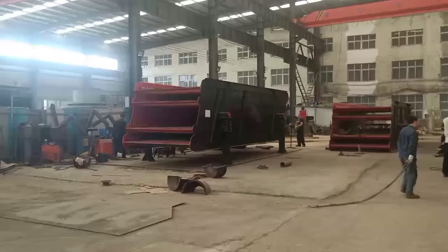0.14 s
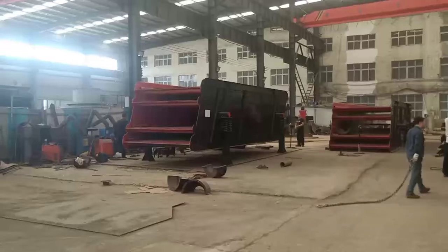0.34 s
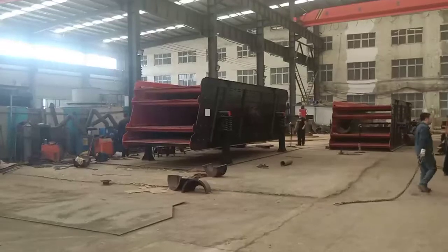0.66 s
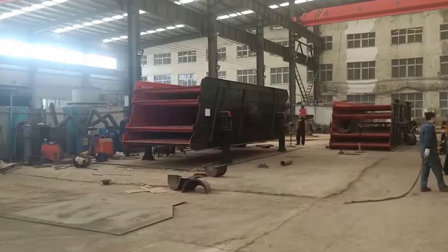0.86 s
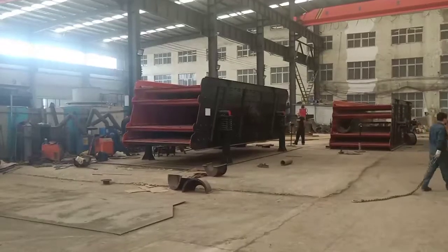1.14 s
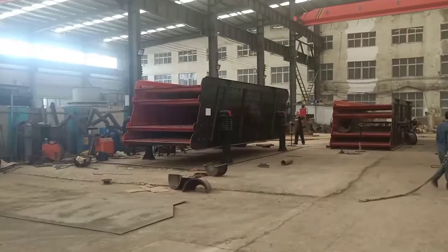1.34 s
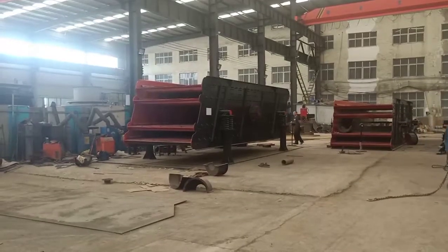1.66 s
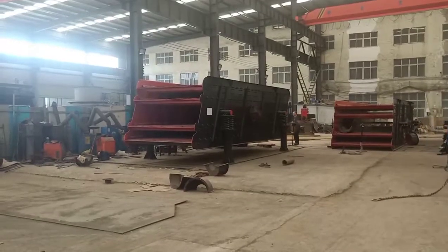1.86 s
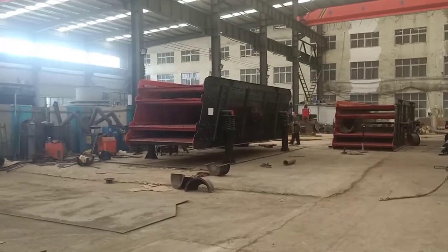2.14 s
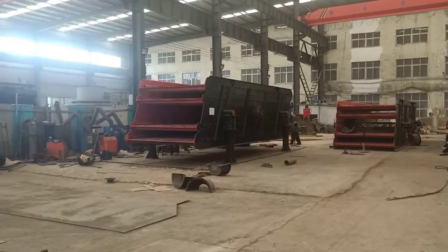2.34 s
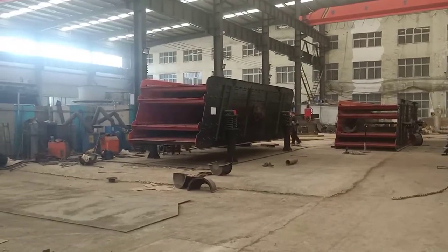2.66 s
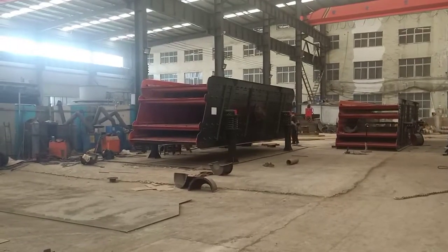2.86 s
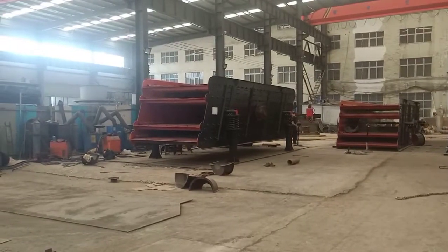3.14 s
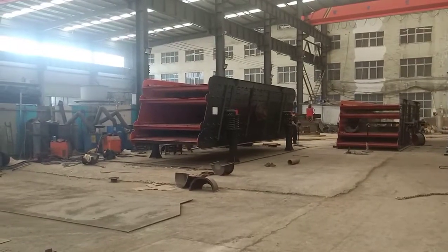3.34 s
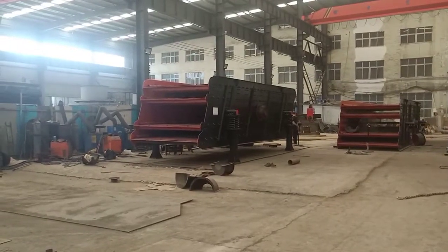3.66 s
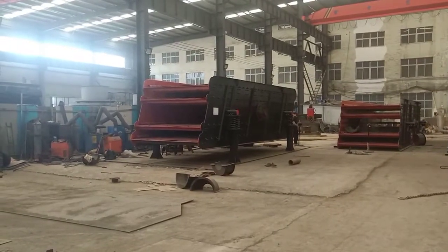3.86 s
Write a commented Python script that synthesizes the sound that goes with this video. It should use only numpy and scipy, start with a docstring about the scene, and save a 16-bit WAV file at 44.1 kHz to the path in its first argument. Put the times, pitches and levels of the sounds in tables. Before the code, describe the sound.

A large vibrating screen machine runs, its steel decks clattering in surges over a thumping drone.

```python
"""A large vibrating screen runs empty in an open workshop hall, heard from some ten metres.
Its loose steel decks clatter and ring in surges, the wire mesh sizzles on top, and heavy parts
rattle lower on the frame, with one harder knock. Underneath, each turn of the eccentric shaft
thumps the box and drives a drone, over a 100 Hz hum, motor tones and a bed of rumble.
The sound fades in at the start."""
import sys
import numpy as np
from scipy import signal
from scipy.fft import rfft, irfft
from scipy.io import wavfile
from scipy.ndimage import uniform_filter1d

SR = 44100
rng = np.random.default_rng(int(sys.argv[2]) if len(sys.argv) > 2 else 0)


def transcribe(u):
    """Save the signal u as a 16-bit wav file named by the first command-line argument.

    u: samples, shape (n,) or (channels, n), limited to [-1, 1]; the rate is SR.
    q: integer samples, one column per channel.
    """
    v = np.clip(np.atleast_2d(u).T, -1, 1)
    q = np.round(v * 32767).astype(np.int16)
    wavfile.write(sys.argv[1], SR, q)


N = 176400
T = np.arange(N) / SR

SHAFT_HZ, MOTOR_HZ, MOTOR_ORDERS = 16.652, 24.45, [5, 10]
BLOW_SCATTER_DB, BLOW_JITTER_S, BLOW_DETUNE = 1.1, .00015, .032  # spread from turn to turn
RATTLE_JITTER_S, DECK_Q = .002, 220
SURGE_ATTACK_S, SURGE_DECAY_S = 0.054, 0.29
KNOCK_S, KNOCK_HZ, KNOCK_T60_S, KNOCK_DB = 1.566, 540, 0.1, -21
HALL_T60_S, TOP_HZ = 0.9, 11900
RUMBLE_DB, FRAME_DB, MESH_DB, DULL_DB, BRIGHT_DB = -35.5, -1.67, 1, -3.2, -2  # layer trims

# fade-in of the low layers and the resting rattle: t/s, gain/dB
FADE_IN = [(.15, -51), (.165, -17.5), (.21, -9), (.28, -3), (.39, 2), (.45, 4.5)]
# tone colour of the rumble: f/Hz, relative level/dB
RUMBLE_SPECTRUM = [(25, -42), (55, -41), (85, -14), (115, -6), (160, 5.5), (230, 2.5), (330, -2),
                   (430, -4.5), (700, -29.5)]
# 100 Hz hum and steady drone tones: multiple of the shaft rate
TONE_ORDERS = [6, 7, 15, 21, 22, 23, 24, 26, 31, 32, 33, 34, 37, 38, 40, 44]
# their balance: relative level/dB
TONE_DB = [-42, -46.5, -42, -44.5, -44, -51, -45, -49.5, -47.5, -48.5, -49, -45.5, -46.5, -47, -48, -52]
# balance of the motor tones: relative level/dB
MOTOR_TONE_DB = [-48, -49]
# blows on the box in each turn: t/s into the turn, f/Hz, half length/s, relative level/dB
BOX_BLOWS = [(0.0311, 185.4, 0.0034, -30), (0.061, 317, 0.0093, -37.5)]
# level ride of the thumps: t/s, gain/dB
THUMP_RIDE = [(.25, -1), (.48, -0.5), (.9, -1.5), (1.5, -3.5), (2.1, -4), (2.72, -4.5), (2.86, -1),
              (3.25, -2), (3.6, -3), (4, -1.5)]
# level ride of the frame clatter: t/s, gain/dB
FRAME_RIDE = [(0.16, -56), (0.22, -40.5), (0.38, -30), (1.3, -30.5), (1.65, -32.5), (2.3, -28.5),
              (2.55, -32), (2.79, -31), (2.87, -26), (3.73, -28.5), (4.0, -28)]
# tone colour of the frame clatter: f/Hz, relative level/dB
FRAME_SPECTRUM = [(250, -41), (400, -16), (470, -7.5), (540, -2), (640, -0.5), (735, -1), (810, -4),
                  (950, -8), (1200, -14.5), (2000, -49)]
# tone colour of the high sizzle, with an EQ notch near 10 kHz: f/Hz, relative level/dB
SIZZLE_SPECTRUM = [(2000, -40), (3200, -4), (4000, 1.5), (5000, 1), (6500, -0.5), (8000, -2.5),
                   (9200, -2.5), (10200, -26), (11500, -11.5)]
# tone colour of the dull deck clatter: f/Hz, relative level/dB
DULL_SPECTRUM = [(700, -18), (1000, -7.5), (1250, -8), (1450, -2), (1700, -3), (2050, 0), (2300, -4),
                 (2700, -19), (4000, -53)]
# tone colour of the bright deck clatter: f/Hz, relative level/dB
BRIGHT_SPECTRUM = [(1600, -31), (2100, -5), (2400, 0.5), (2570, 2), (2700, -5), (2810, 0.5), (3050, -5.5),
                   (3400, -7.5), (4200, -15), (7000, -55)]
# modes of the lower-pitched deck: f/Hz
LOW_MODE_HZ = [980, 1464, 1502, 1653, 1778, 1846, 1922, 2010, 2287, 2751, 2800, 3130]
# their balance: relative level/dB
LOW_MODE_DB = [-4.5, -3.5, .5, -2, -3, 2, -7, -0.5, -0.5, 0, -2.5, -3.5]
# modes of the higher-pitched deck: f/Hz
HIGH_MODE_HZ = [1416, 1599, 1975, 2014, 2075, 2234, 2420, 2474, 2630, 2765, 2880, 2950, 3004, 3262]
# their balance: relative level/dB
HIGH_MODE_DB = [-4, -4.5, -1.5, -1.5, 0, -5.5, -4, 0.5, -2, -0.5, 2, -3, -2, -6]
# surges of rattle: t/s, hold/s, then relative level/dB for each of
# dull clatter, bright clatter, mesh sizzle, low deck ring, high deck ring
RATTLE_SURGES = [(0.337, 0.063, -30.5, -27.5, -34, -26.5, -34), (0.676, 0.11, -30, -28, -38, -29, -37),
                 (0.97, 0.05, -27, -28.5, -41, -31, -35), (1.228, 0.11, -27.5, -29, -39.5, -30, -33),
                 (1.54, 0.033, -26.5, -30, -34.5, -34, -32), (1.793, 0.08, -28.5, -32, -37.6, -33, -32),
                 (1.94, 0.11, -29.5, -41, -38.5, -48, -39), (2.162, 0.06, -32, -29, -36.5, -38, -36.5),
                 (2.795, 0.068, -31.0, -28.5, -35.7, -40, -31.5),
                 (3.147, 0.12, -28, -26.5, -36, -38, -29.5), (3.464, 0.13, -32.5, -27, -36, -38, -31.5),
                 (3.776, 0.16, -30.5, -28, -37.5, -34, -31)]


def undb(db):
    """Decibels to gain."""
    return 10 ** (np.asarray(db) / 20)


def unit(x):
    """Scale to rms 1."""
    return x / np.sqrt(np.mean(x ** 2))


def ride(points):
    """A fader move through (t/s, gain/dB) points."""
    times, db = np.array(points).T
    return undb(np.interp(T, times, db))


def drift(rate_hz):
    """Slow, smooth random motion; rms 1."""
    span = int(SR / rate_hz)
    steps = np.repeat(rng.standard_normal(N // span + 1), span)
    return unit(uniform_filter1d(uniform_filter1d(steps, span), span)[:N])


def colour(x, points):
    """EQ through (f/Hz, level/dB) points; rms 1."""
    hz, db = np.array(points).T
    bin_hz = np.maximum(np.fft.rfftfreq(N, 1 / SR), 1)
    gain = undb(np.interp(np.log(bin_hz), np.log(hz), db))
    return unit(irfft(rfft(x) * gain, N))


def hall(x, wet_db):
    """Direct sound plus a diffuse tail that wraps round, so the hall is already full of sound."""
    tail = rng.standard_normal(N) * np.exp(-np.log(1000) * T / HALL_T60_S)
    return x + undb(wet_db) * irfft(rfft(x) * rfft(tail / np.linalg.norm(tail)), N)


def rumble():
    """The bed: diffuse low noise of the machine in the hall."""
    return undb(RUMBLE_DB) * colour(rng.standard_normal(N), RUMBLE_SPECTRUM)


def hum(hz, db, waver_db=1.2):
    """One steady tone whose level wavers a little."""
    peak = np.sqrt(2) * undb(db + waver_db * drift(rate_hz=4.08))
    return peak * np.sin(2 * np.pi * (hz * T + rng.random()))


def drone():
    """A 100 Hz hum and steady tones at multiples of the shaft rate; motor tones beat against them."""
    tones = sum(hum(k * SHAFT_HZ, db) for k, db in zip(TONE_ORDERS, TONE_DB))
    motor = sum(hum(k * MOTOR_HZ, db) for k, db in zip(MOTOR_ORDERS, MOTOR_TONE_DB))
    return tones + motor


def turns():
    """The machine's pulse: start times of the shaft's turns."""
    return np.arange(-1, N / SR * SHAFT_HZ) / SHAFT_HZ


def thumps():
    """The box wall flexes in one short swell per turn, and knocks more lightly on the way back."""
    blows, starts = 0, turns()
    for at, hz, half_length, db in BOX_BLOWS:
        late, force, detune = rng.standard_normal((len(starts), 3)).T
        turn = np.clip(np.round((T - at) * SHAFT_HZ).astype(int) + 1, 0, len(starts) - 1)
        from_peak = T - (starts + at + BLOW_JITTER_S * late)[turn]
        pitch = hz * (1 + BLOW_DETUNE * detune[turn])
        swell = np.exp(-.5 * (from_peak / half_length) ** 2)
        flex = swell * np.sin(2 * np.pi * pitch * from_peak)
        blows = blows + undb(db) * unit(flex * undb(BLOW_SCATTER_DB * force[turn]))
    return hall(blows * ride(THUMP_RIDE), wet_db=-21)


def contacts(parts):
    """Loose parts each click once a turn, near their own shaft angle and with uneven force."""
    starts = turns()[:, None]
    angle, side = rng.random(parts), rng.choice([-1, 1], parts)
    late = RATTLE_JITTER_S * rng.standard_normal((len(starts), parts))
    force = side * rng.random(late.shape) ** 2
    times = starts + angle / SHAFT_HZ + late
    inside = (times >= 0) & (times < N / SR)
    return np.bincount((times[inside] * SR).astype(int), force[inside], N)[:N]


def clatter(parts):
    """Three groups of loose parts across the machine, each with its own path through the hall."""
    return sum(hall(contacts(parts), wet_db=3.5) for _ in range(3))


def knock():
    """One heavier part strikes the frame, which rings briefly."""
    age = np.maximum(T - KNOCK_S, 0)
    ring = np.sin(2 * np.pi * KNOCK_HZ * age) * np.exp(-np.log(1000) * age / KNOCK_T60_S)
    return hall(undb(KNOCK_DB) * ring, wet_db=-7)


def frame():
    """Heavy loose parts clatter on the frame and give the rattle its body."""
    return undb(FRAME_DB) * ride(FRAME_RIDE) * colour(clatter(parts=28), FRAME_SPECTRUM)


def surges(column, rest_db):
    """Envelope of a rattle layer: each surge bites, holds, then dies back to the resting rattle."""
    power = (undb(rest_db) * ride(FADE_IN)) ** 2
    for row in RATTLE_SURGES:
        age, hold = T - row[0], row[1]
        rise = np.clip(age / SURGE_ATTACK_S, 0, 1)
        fall = np.exp(-np.maximum(age - SURGE_ATTACK_S - hold, 0) / SURGE_DECAY_S)
        power = power + (undb(row[column]) * rise * fall) ** 2
    return np.sqrt(power)


def mesh():
    """Many wire crossings tick together into a sizzle."""
    sizzle = colour(clatter(parts=70), SIZZLE_SPECTRUM)
    return undb(MESH_DB) * surges(column=4, rest_db=-45) * sizzle


def deck_ring(mode_hz, mode_db):
    """A steel deck's narrow modes, kept ringing by loose parts that strike it."""
    hits = clatter(parts=26)
    modes = [signal.lfilter(*signal.iirpeak(hz, DECK_Q, fs=SR), hits) for hz in mode_hz]
    return unit(sum(undb(db) * unit(mode) for mode, db in zip(modes, mode_db)))


def decks():
    """The decks chatter against their supports, dull and bright, and each rings with its own modes."""
    dull = surges(column=2, rest_db=-33) * colour(clatter(parts=26), DULL_SPECTRUM)
    bright = surges(column=3, rest_db=-37) * colour(clatter(parts=32), BRIGHT_SPECTRUM)
    low_ring = surges(column=5, rest_db=-46) * deck_ring(LOW_MODE_HZ, LOW_MODE_DB)
    high_ring = surges(column=6, rest_db=-44.5) * deck_ring(HIGH_MODE_HZ, HIGH_MODE_DB)
    return undb(DULL_DB) * dull + undb(BRIGHT_DB) * bright + low_ring + high_ring


def scene():
    """Mono mix: the low running sound of box and motor under the surging rattle."""
    low_end = ride(FADE_IN) * (thumps() + drone() + rumble())
    return (low_end + frame() + knock() + decks() + mesh())[None]


def record(dry):
    """The sound opens after a moment of silence; a steep low-pass cuts the top."""
    gate = np.clip((T - .158) / .004, 0, 1)
    low_pass = signal.ellip(10, .2, 80, TOP_HZ, fs=SR, output="sos")
    return signal.sosfilt(low_pass, dry * gate)


dry = scene()
out = record(dry)
transcribe(out)
```